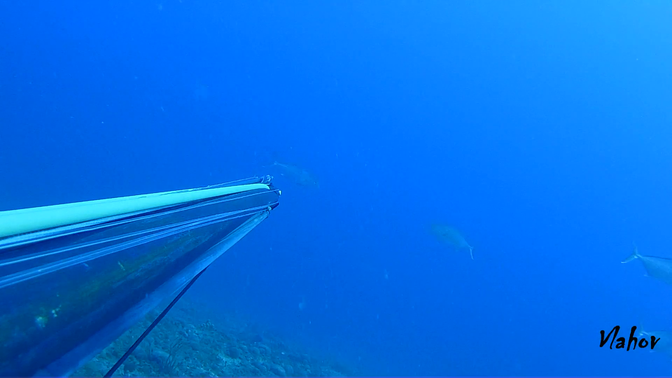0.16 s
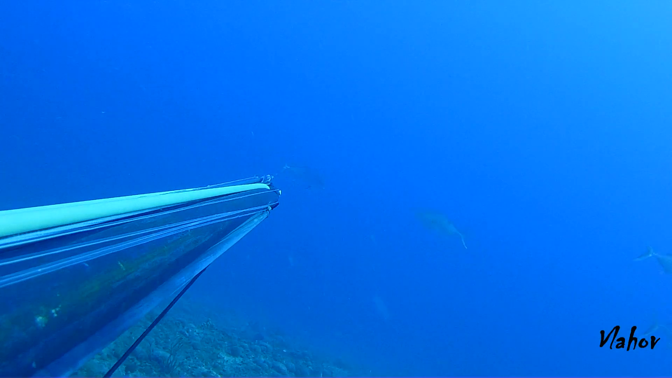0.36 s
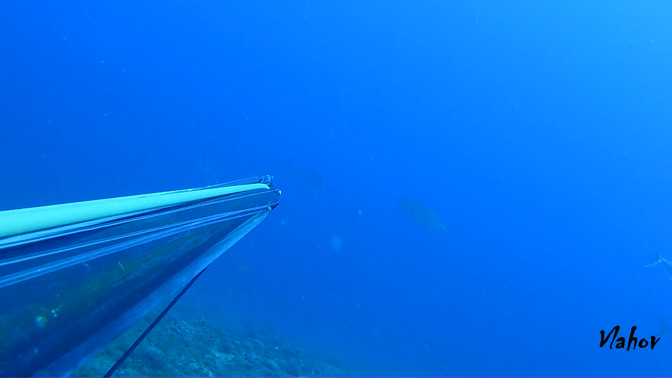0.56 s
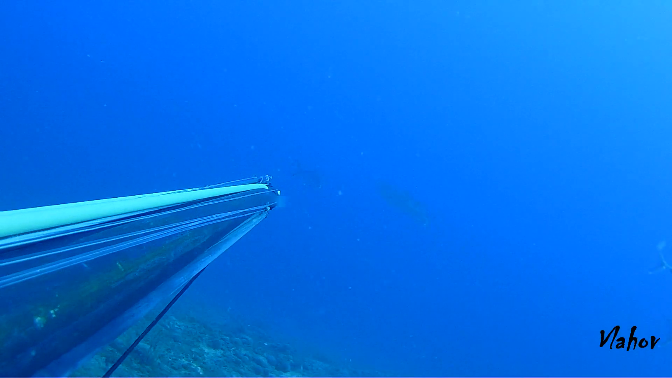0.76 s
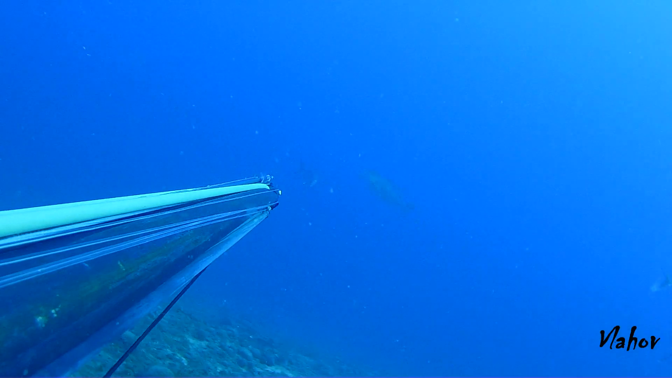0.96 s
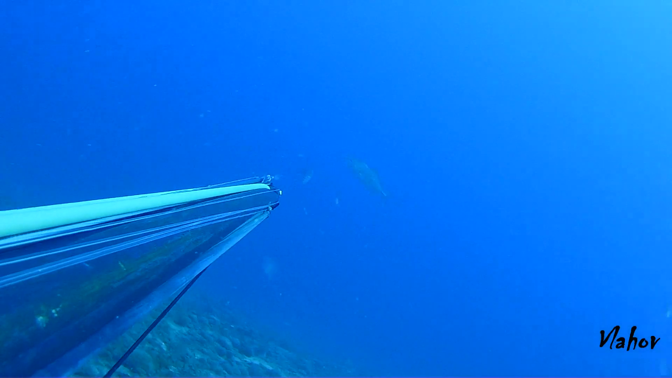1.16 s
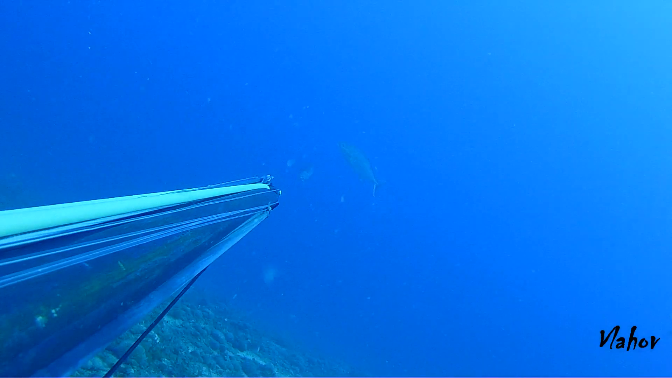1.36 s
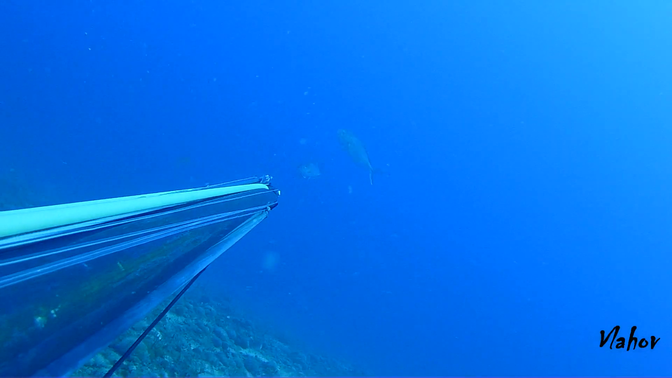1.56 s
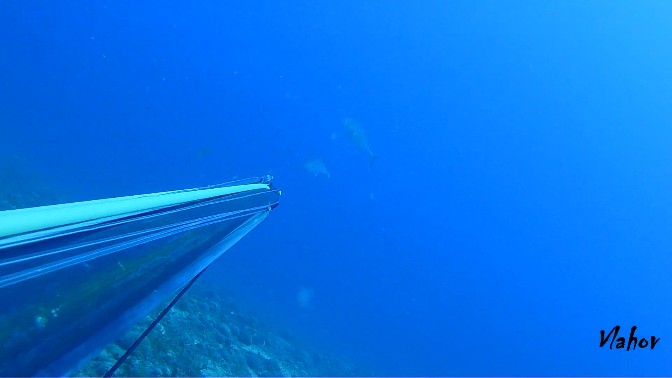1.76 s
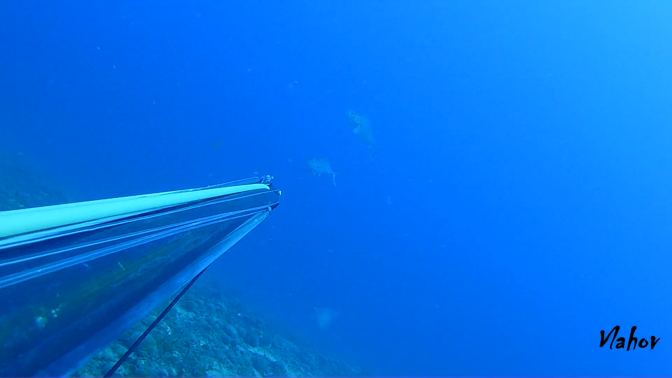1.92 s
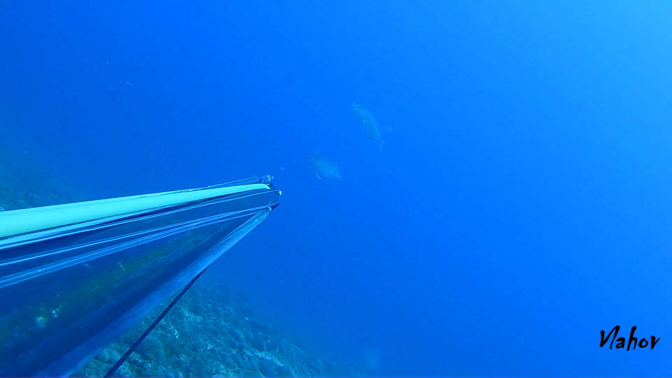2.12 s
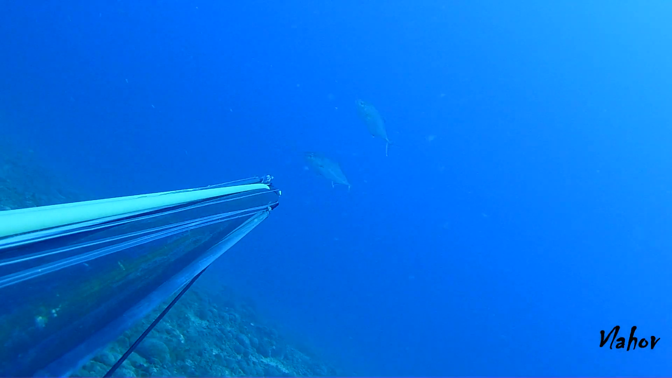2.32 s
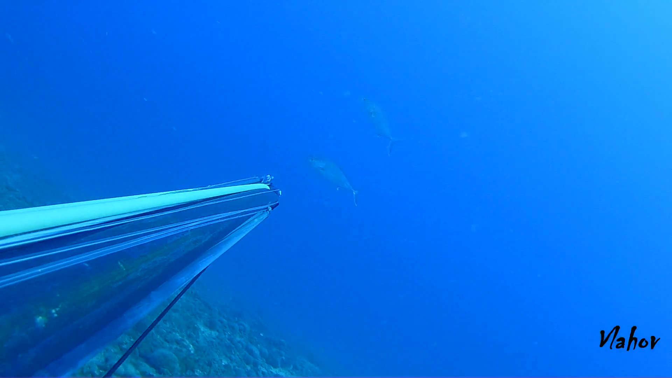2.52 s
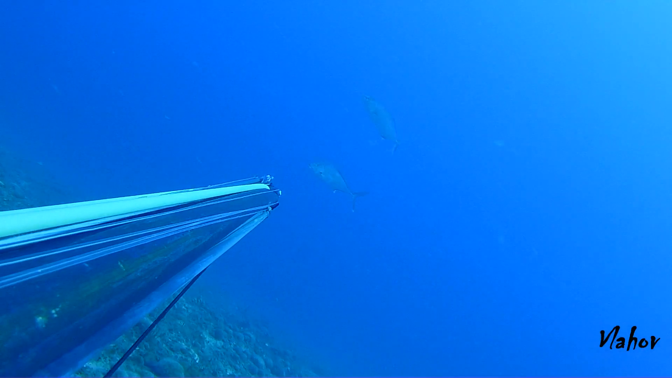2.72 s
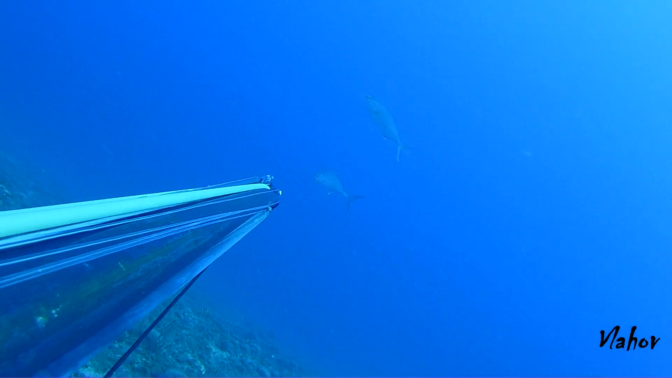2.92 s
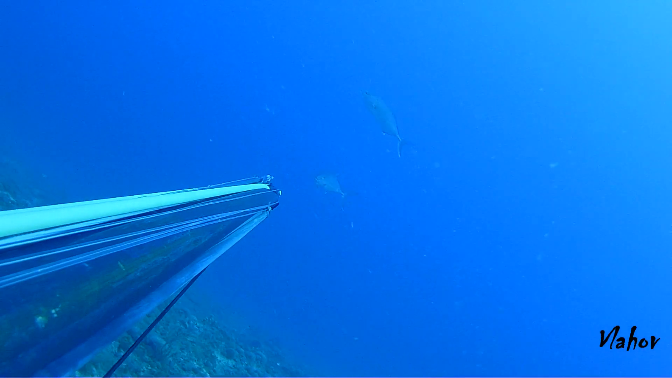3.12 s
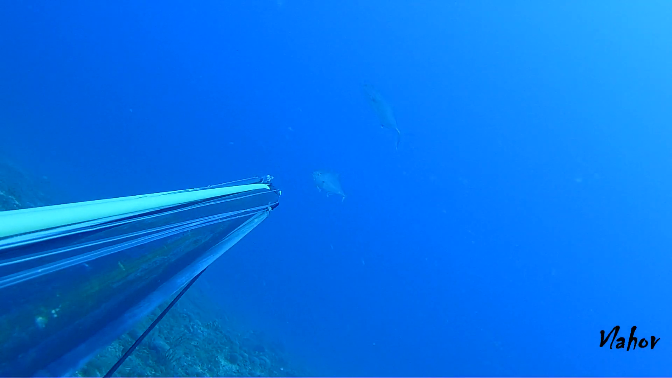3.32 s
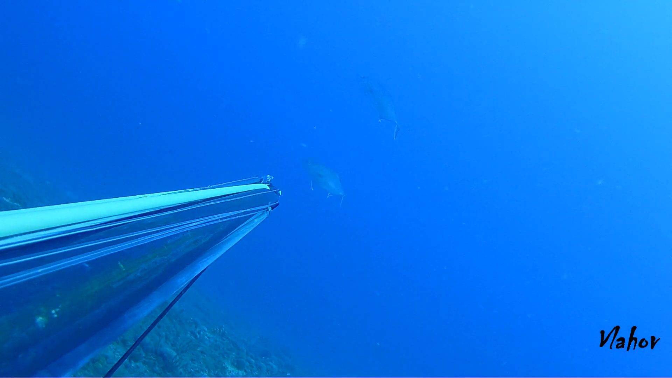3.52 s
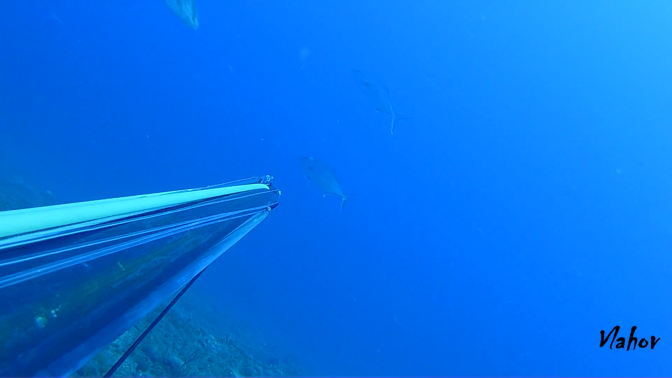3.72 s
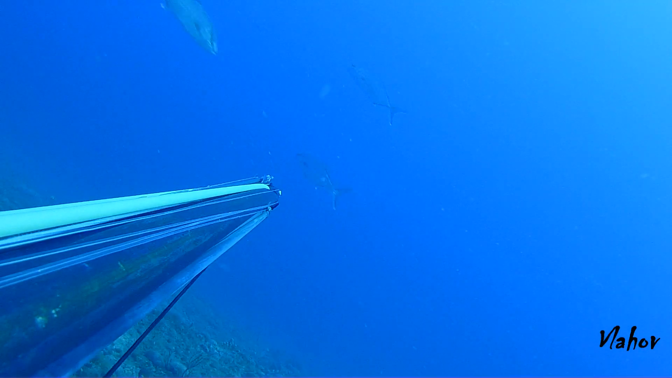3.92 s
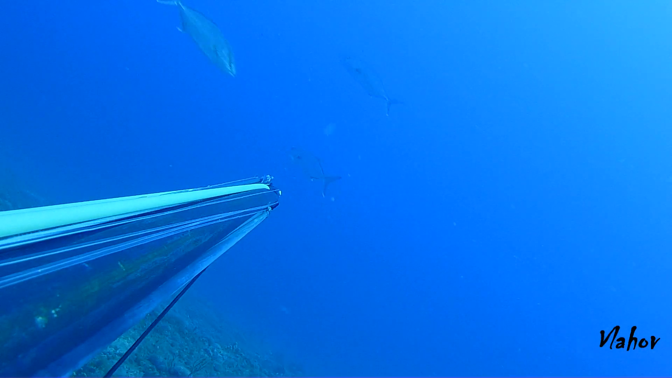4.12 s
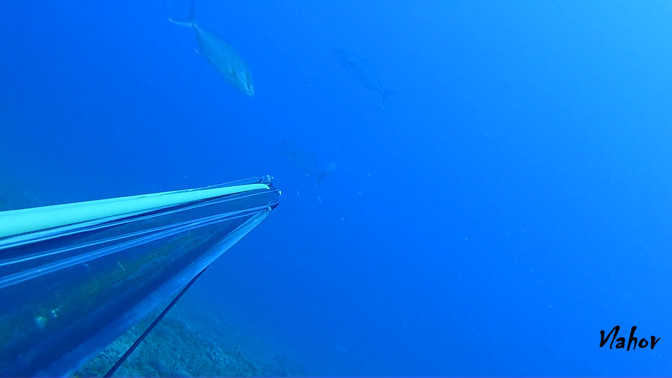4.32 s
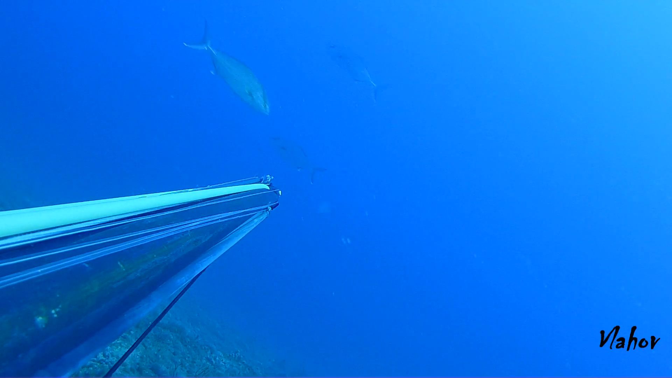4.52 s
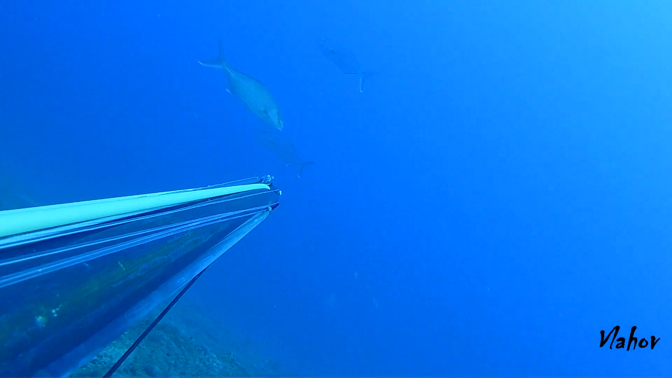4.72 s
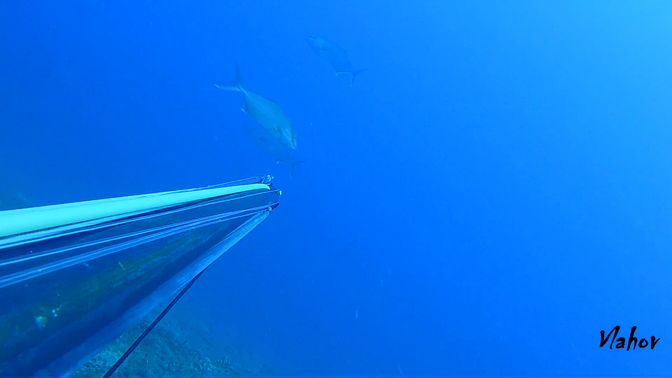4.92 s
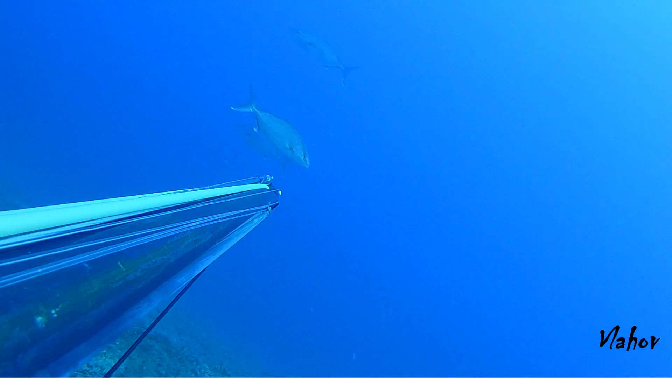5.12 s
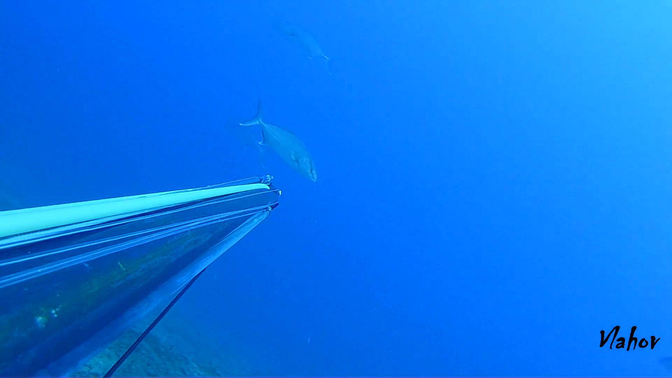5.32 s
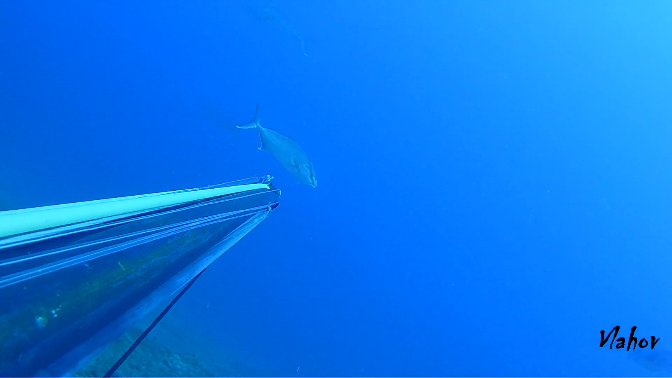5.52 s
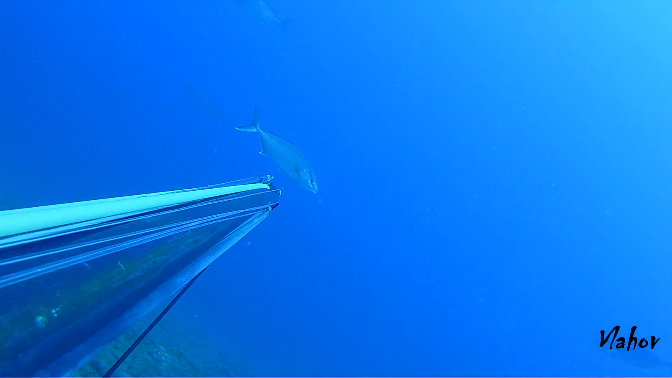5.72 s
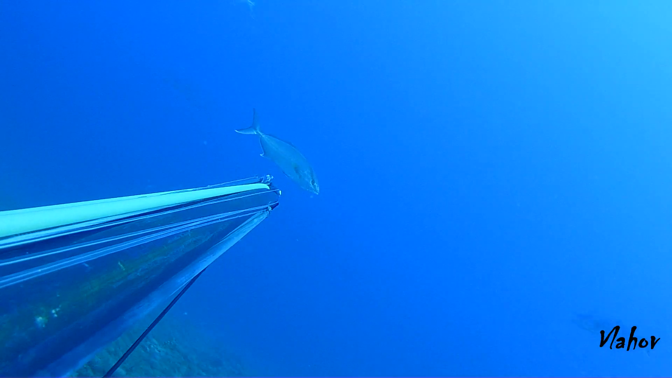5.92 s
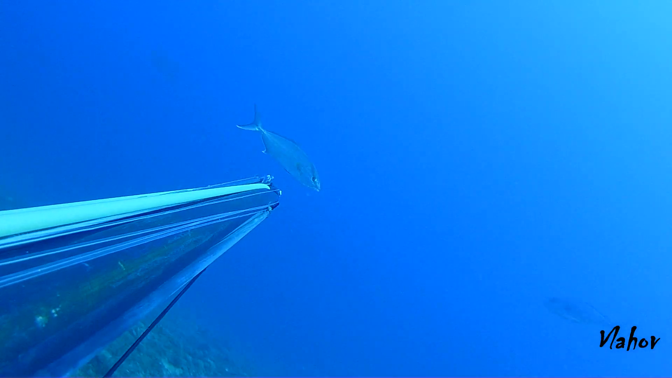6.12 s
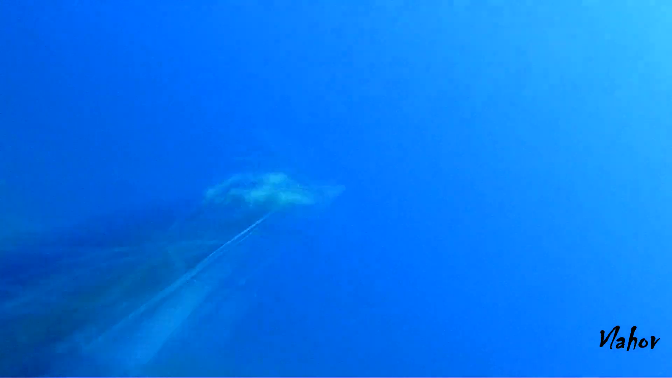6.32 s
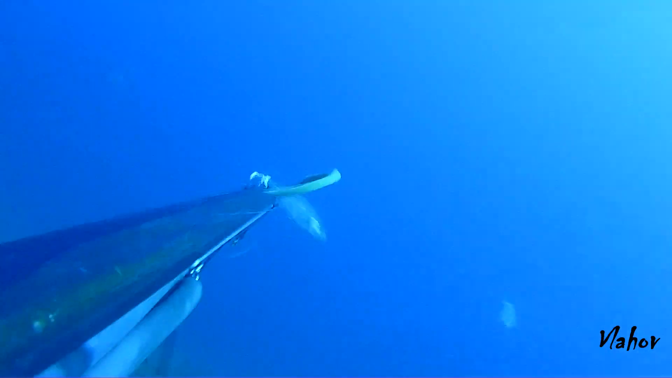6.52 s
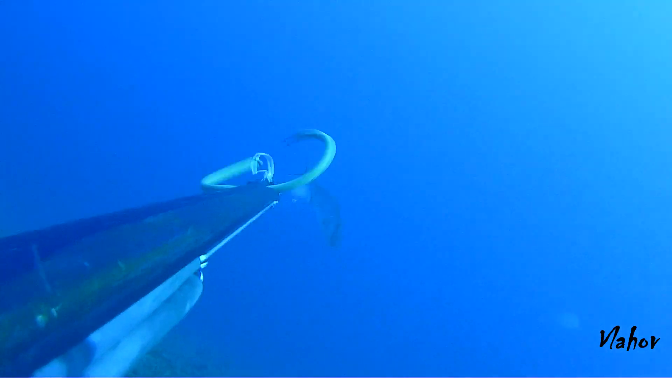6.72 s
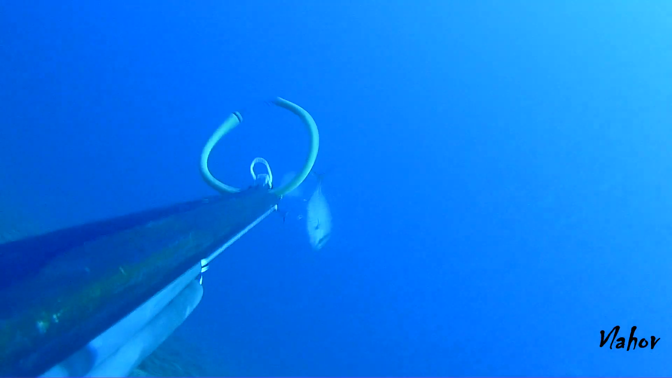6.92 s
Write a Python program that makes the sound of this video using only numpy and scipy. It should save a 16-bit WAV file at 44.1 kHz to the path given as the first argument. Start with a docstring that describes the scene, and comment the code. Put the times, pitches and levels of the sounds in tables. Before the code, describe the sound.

Underwater hush with shrimp crackle, dull knocks and short creaks of a handled speargun, then a violent clipped shot, slapping bands and line running out.

```python
"""Under the sea, a camera rides on a loaded speargun, in a soft wash of filtered noise and shrimp crackle.
First come small knocks and stuttering creaks of the handled gun: short forces ringing the modes of its body.
The gun fires: grains and noise scrape as the shaft runs down its track, the bands shove the water and slap
the barrel, then the line runs out. The loudest moments drive the microphone hard into flat clipping."""
import sys
import numpy as np
from scipy import signal
from scipy.fft import rfft, irfft, next_fast_len
from scipy.io import wavfile
from scipy.ndimage import map_coordinates

SR = 44100
rng = np.random.default_rng(int(sys.argv[2]) if len(sys.argv) > 2 else 0)


def to_wav(s):
    """Save 16-bit WAV."""
    ch = np.atleast_2d(s).T  # columns
    pcm = np.round(np.clip(ch, -1, 1) * 32767)  # PCM
    wavfile.write(sys.argv[1], SR, pcm.astype(np.int16))


N = 306495
TIME = np.arange(N) / SR  # [s]

# wash of open water, relative spectrum: (frequency [Hz], density [dB per Hz])
SEA_SPECTRUM = [(20, 3), (65, 1), (154, 0.5), (422, -4.5), (678, -7.5), (1200, -14), (1910, -19),
                (2500, -17), (3900, -25), (5300, -24.5), (6300, -27.5), (8800, -29), (11000, -31.5),
                (16000, -50)]
# one shrimp's claw snap, relative spectrum: (frequency [Hz], density [dB per Hz])
SNAP_SPECTRUM = [(500, -36), (1700, -18), (2500, 4), (3100, -0.5), (3800, -9.5), (4500, -3), (5400, -1),
                 (6300, -8.5), (7000, -2.5), (7700, -7), (9000, -4), (10500, -22), (15500, -8.5)]
# the nearest shrimp: (time [s], level before the near gain [dB], treble against the rest [dB])
NEAR_SNAPS = [(0.532, -33, -8), (2.196, -31, -11), (2.7433, -33, -4), (3.276, -38, 8), (3.439, -28, -17),
              (4.117, -36.5, -12), (4.4167, -30.5, -12.5), (4.95, -31.5, -7), (5.7606, -30, -16),
              (6.1073, -22, -2.5), (6.3072, -33.5, -2)]
# grip and gun rubbing softly, relative spectrum: (frequency [Hz], density [dB per Hz])
RUB_SPECTRUM = [(20, 7), (55, -2.5), (110, -0.5), (300, -15.5), (700, -21.5), (1800, -40), (3000, -63)]
# dull knocks on the handled gun: (time [s], peak level [dB])
KNOCK_HITS = [(.461, -7), (.553, -27.5), (.815, -14), (.895, -20.5), (.95, -24), (1.104, -10.5),
              (1.223, -25), (1.312, -29), (1.608, -8), (1.722, -20), (1.86, -12), (2.2, -24.5),
              (2.68, -9.5), (2.941, -5), (2.948, -17.5), (3.002, -24), (3.05, -23.5), (3.222, -10.5),
              (4.77, -23.5), (4.947, -12.5), (5.125, -8.5), (5.978, -14.5), (6.23, -10.5)]
# creaks, each a short run of slips: (time [s], peak level [dB], length [s])
CREAK_RUNS = [(.383, -18.5, 0.011), (1.244, -17.5, 0.0085), (1.742, -18.5, 0.017), (2.363, -20, 0.013),
              (2.868, -15, 0.0071), (3.097, -20.5, 0.006), (4.789, -20, 0.01), (5.009, -14.5, 0.01),
              (5.647, -20, .0081), (6.179, -16, 0.0088)]
# modes of the gun with its camera housing, before scatter: (frequency [Hz], relative level [dB], t60 [s])
BODY_MODES = [(39.7, -33, 0.32), (65.3, -30, 0.23), (104.6, -26.5, 0.78), (134.7, -17, 0.27),
              (157.9, -2, 0.08), (246.6, -12, 0.057), (300, -12.5, 0.046), (431, -20, 0.058),
              (546, -32.5, 0.091), (613.4, -24, 0.12), (1050, -12.5, 0.011), (1466, -14, 0.026),
              (1720, -12.5, 0.015), (2340, 4, 0.008)]
# what the housing wall lets through: (frequency [Hz], gain [dB])
WALL_GAIN = [(500, 0), (660, 4.5), (800, -10.5), (950, 0), (1200, -1.5), (1900, -1.5), (2100, -20.5),
             (2600, -21), (3400, -18.5), (5000, -49), (16000, -68)]
# the shaft leaves, then the line runs out: (time at full speed [s], hold [s], rise [dB/s],
# low thudding [dB], bright rattling [dB], surge of water [dB])
SHOT_RUNS = [(6.384, 0.21, 1100, 7.5, 9.5, 16.5), (6.871, 0.056, 432, -9.5, -6.5, -14.5)]
# hardest strikes of trigger, shaft and line, before the water cushions them: (time [s], level [dB], t60 [s])
CLASH_HITS = [(6.341, -20, .054), (6.348, -5.5, 0.046), (6.3637, 36, 0.018), (6.418, 36, 0.025),
              (6.432, 40.5, 0.0211), (6.4696, 37, 0.013), (6.498, 30.5, 0.03), (6.616, -6.5, 0.037),
              (6.627, 10, 0.0093), (6.669, -10.5, 0.05), (6.781, -15.5, 0.033), (6.809, -14, 0.021),
              (6.8727, 9, 0.017), (6.9, 8, .022)]
# shaft and line scraping, relative spectrum: (frequency [Hz], density [dB per Hz])
SCRAPE_SPECTRUM = [(60, -14), (160, 1.5), (320, -3.5), (480, -2), (660, 3.5), (850, -4), (1200, -12.5),
                   (1550, -2.5), (1850, -5), (2200, -29.5), (3200, -21), (4200, -37), (9000, -44.5),
                   (16000, -62)]
# water shoved past the housing, relative spectrum: (frequency [Hz], density [dB per Hz])
SURGE_SPECTRUM = [(15, -9.5), (40, 0.5), (60, -8), (80, -5), (140, -12), (220, -13.5), (500, -32.5),
                  (1500, -73.5)]

SEA_DB = -50.5
STRAY_COUNT, STRAY_DB, STRAY_TREBLE_DB = 28, -38, -7  # shrimp a little farther off, snapping at random
SLIDE_LAG_S, SLIDE_HALF_S, SLIDE_DB = 0.021, 0.027, -18.5  # grip slides; level against the creak
SWAY_LAG_S, SWAY_HALF_S, SWAY_DB = 0.033, 0.065, -45  # the gun sways a little after any knock
SOFT_CONTACT_HZ, HARD_CONTACT_HZ = 444, 2100  # brightness of the lightest touch; what a 0 dB blow adds
REBOUND_S, REBOUND_LOSS_DB, REBOUND_HZ = .054, 20, 747  # typical delay, loss and brightness of the fall back
TOUCH_COUNT, TOUCH_DB = 6, -37.5  # faint stray touches
LEAD_S = .0012  # handling blows start this early, since the load takes a moment to build up
FLAP_START_S, FLAP_GAP_S, FLAP_COUNT = 6.532, .0312, 8
FLAP_DB, FLAP_LOSS_DB = 5, 2.5  # the first flap, and the loss from each to the next
FLAP_FIRST_HZ, FLAP_LAST_HZ = 200, 850  # contact brightness, from a broad slap to a light tap
THUD_SAG_DB_PER_S, RATTLE_SAG_DB_PER_S, SURGE_SAG_DB_PER_S = 61.5, 99.5, 119.5  # water brakes each run
THUD_RELEASE_DB_PER_S, RATTLE_RELEASE_DB_PER_S, SURGE_RELEASE_DB_PER_S = 1000, 339, 400  # after a run
SLACK_THUD_DB, SLACK_RATTLE_DB, SLACK_SURGE_DB = -30.5, -37, -24  # water churning around the slack line
CLATTER_PER_S, CLATTER_DB, CLATTER_T60_S = 50, 8, .02  # lighter strikes; level against the rattling
TOP_HZ = 16100  # band limit of the camera


def amp(db):
    """Decibels to gain."""
    return 10 ** (np.asarray(db) / 20)


def unit(x):
    """Scale to rms 1."""
    return x / np.sqrt(np.mean(x ** 2) + 1e-20)


def fade(t, t60):
    """Exponential decay, 60 dB down after t60."""
    return np.exp(-np.log(1000) * t / t60)


def add(track, s, sound):
    """Mix a sound into the track from time s."""
    room = track[max(round(s * SR), 0):][:len(sound)]
    room += sound[:len(room)]


def lowpass(x, hz, order):
    """Causal low-pass."""
    return signal.sosfilt(signal.butter(order, np.clip(hz, 20, SR / 2 - 1), fs=SR, output="sos"), x)


def highpass(x, hz, order):
    """Causal high-pass."""
    return signal.sosfilt(signal.butter(order, np.clip(hz, 20, SR / 2 - 1), "high", fs=SR, output="sos"), x)


def colour(x, points):
    """Causal minimum-phase filter whose gain follows (frequency [Hz], gain [dB]) points on a log axis."""
    size = 2 * next_fast_len(len(x))
    hz, db = np.transpose(points)
    gain = amp(np.interp(np.log(np.fft.rfftfreq(size, 1 / SR) + 1), np.log(hz), db))
    # folding the cepstrum onto positive time makes the filter causal
    cepstrum = irfft(np.log(gain))
    cepstrum[1:size // 2] *= 2
    cepstrum[size // 2 + 1:] = 0
    return irfft(rfft(x, size) * np.exp(rfft(cepstrum)))[:len(x)]


def noise(points):
    """Coloured noise of rms 1."""
    return unit(colour(rng.standard_normal(N), points))


def wobble(rate):
    """A smooth random curve, rate knots a second."""
    return map_coordinates(rng.standard_normal(4096), [TIME * rate], mode="wrap")


def grains(rate, spread_db):
    """Random impulses, rate a second on average, most small and a few large."""
    hit = rng.random(N) < rate / SR
    size_db = spread_db * np.minimum(rng.exponential(size=N), 4)
    return hit * rng.choice([-1, 1], N) * amp(size_db)


def sea():
    """The soft, slowly shifting wash of open water."""
    return amp(SEA_DB + 0.68 * wobble(rate=4.14)) * noise(SEA_SPECTRUM)


def shrimp(near_db=11, far_db=-62.5, ring_t60=0.015, ring_share=0.15):
    """Claw snaps, a few near and a dense crackle far off, each ringing briefly in the housing."""
    t = TIME[:SR // 25]
    hz, snap_db = np.transpose(SNAP_SPECTRUM)
    octaves = np.log2(np.clip(hz, 2500, 9000) / 5000)

    def snap(treble_db):
        """One click of unit energy with a noisy tail."""
        # snaps that come off the rocks are both duller and more drawn out
        bright = treble_db + 8
        click = ring_share * rng.standard_normal(len(t)) * fade(t, ring_t60 / amp(bright))
        click[0] += 1
        click = colour(click, np.c_[hz, snap_db + .8 * bright * octaves])
        click = lowpass(click, 14000, order=4)
        return click / np.linalg.norm(click)

    near = np.zeros(N)
    for s, db, treble_db in NEAR_SNAPS:
        add(near, s, amp(db + near_db) * snap(treble_db))
    for when, size, tone in rng.random((STRAY_COUNT, 3)):
        level_db = STRAY_DB + near_db + 6.7 * (size - .5)
        add(near, when * TIME[-1], amp(level_db) * snap(STRAY_TREBLE_DB + 16 * (tone - .5)))
    far = np.zeros(N)
    for treble_db in np.linspace(-13, -3, num=8):
        far += signal.fftconvolve(grains(rate=22, spread_db=3.0), snap(treble_db))[:N]
    return near + amp(far_db) * unit(far)


def rubs():
    """Soft rumbling swells: the grip slides as each creak lets go, and the gun sways after each knock."""
    def swell(s, half):
        """A bell-shaped rise and fall around time s."""
        return np.exp(-((TIME - s) / half) ** 2)

    slides = sum(amp(db + SLIDE_DB) * swell(s + SLIDE_LAG_S, SLIDE_HALF_S) for s, db, _ in CREAK_RUNS)
    sways = amp(SWAY_DB) * sum(swell(s + SWAY_LAG_S, SWAY_HALF_S) for s, _ in KNOCK_HITS)
    return (slides + sways) * noise(RUB_SPECTRUM) * amp(4.0 * wobble(rate=60))


def gun_ring(force, contact_hz, scatter_db=4.0, loose=0.94, loose_hz=500, loose_t60=0.061, tick_db=-31):
    """The body's answer to a force, peak 1 plus a tick; each blow shares its energy differently among modes."""
    t = np.arange(SR // 2) / SR
    hz, db, t60 = np.transpose(BODY_MODES)[:, :, None]
    size, detune = rng.standard_normal((2, len(BODY_MODES), 1))
    modes = np.cos(2 * np.pi * hz * (1 + 0.019 * detune) * t) * fade(t, t60)
    ring = np.sum(amp(db + scatter_db * size) * modes, axis=0)
    # the load builds up and lets go: the slower the build-up, the duller the blow
    load = np.exp(-2 * np.pi * contact_hz * t[:SR // 500])[::-1]
    # loose fittings chatter on after the blow and roughen its upper modes
    chatter = rng.standard_normal(len(t)) * (fade(t, loose_t60) - fade(t, 0.0072))
    chatter = highpass(chatter, loose_hz, order=2)
    chatter *= loose / np.linalg.norm(chatter)
    chatter[0] = 1
    ring = signal.fftconvolve(ring, chatter)
    ring = signal.fftconvolve(ring, np.convolve(force, load))[:len(t)]
    ring = colour(ring, WALL_GAIN)
    # only a faint tick gets through above the body's last resonances
    tick = highpass(rng.standard_normal(len(t)), 1700, order=1)
    tick = lowpass(tick, 3000, order=2) * fade(t, 0.04)
    return ring / np.abs(ring).max() + amp(tick_db) * np.roll(tick, SR // 500)


def push(db, contact_hz, loose=0.8):
    """A single push that leaves the barrel ringing low; the sharper it is, the more it shakes the fittings."""
    return amp(db) * gun_ring([1.], contact_hz, loose=loose * contact_hz / 700)


def knocks():
    """Harder knocks are brighter, each is followed by a light rebound, and faint touches fall in between."""
    out = np.zeros(N)
    for s, db in KNOCK_HITS:
        add(out, s - LEAD_S, push(db, SOFT_CONTACT_HZ + HARD_CONTACT_HZ * amp(db) ** 2))
        # the part falls back once
        rebound = s + REBOUND_S * np.exp(.12 * rng.standard_normal())
        add(out, rebound, push(db - REBOUND_LOSS_DB, REBOUND_HZ))
    for s in rng.uniform(KNOCK_HITS[0][0], SHOT_RUNS[0][0], TOUCH_COUNT):
        add(out, s, push(TOUCH_DB, SOFT_CONTACT_HZ))
    return out


def creaks(slip_hz=540, jitter=0.432, first_share=0.55):
    """A tight part sticks and slips at an uneven pace, on the whole harder each time, until it comes free."""
    out = np.zeros(N)
    for s, db, length in CREAK_RUNS:
        gap, size = rng.standard_normal((2, 24))
        when = np.cumsum(np.exp(jitter * gap)) / slip_hz
        when -= when[0]
        progress = when / length
        # the sixth power all but silences slips past the creak's length
        slips = (first_share + progress) * np.exp(0.19 * size - progress ** 6)
        force = np.bincount((when * SR).astype(int), slips)
        add(out, s - LEAD_S, amp(db) * gun_ring(force, contact_hz=1390, loose=0.38))
    return out


def flaps():
    """The spent bands whip against the barrel at an even pace, lighter and crisper each time."""
    out = np.zeros(N)
    for k, contact_hz in enumerate(np.geomspace(FLAP_FIRST_HZ, FLAP_LAST_HZ, num=FLAP_COUNT)):
        add(out, FLAP_START_S + k * FLAP_GAP_S, push(FLAP_DB - k * FLAP_LOSS_DB, contact_hz))
    return out


def bubbles(centre_hz, spread, cycles, rise, count):
    """Overlapping short notes of torn water, each gliding upward; rms 1 from the first hard clash on."""
    out, t = np.zeros(N), TIME[:SR // 16]
    first = CLASH_HITS[0][0]
    starts = first + (TIME[-1] - first) * (np.arange(count) + rng.random(count)) / count
    for s, (pitch, size) in zip(starts, rng.standard_normal((count, 2))):
        hz = centre_hz * np.exp(spread * pitch)
        age = t * hz / cycles
        glide = 1 + rise * np.minimum(age, 3) / 2
        add(out, s, amp(3.6 * size) * age * np.exp(-3 * age) * np.sin(2 * np.pi * hz * t * glide))
    return out / out[round(first * SR):].std()


def run_level(peaks_db, sag_db_per_s, release_db_per_s, slack_db):
    """Gain of one shot layer: each run rises, sags as water brakes it, and falls back to the churning."""
    gain = amp(slack_db) * (TIME > SHOT_RUNS[0][0])
    for (s, hold, rise_db_per_s, *_), db in zip(SHOT_RUNS, peaks_db):
        age = TIME - s
        drop_db = rise_db_per_s * np.maximum(-age, 0)
        drop_db += sag_db_per_s * np.clip(age, 0, hold)
        drop_db += release_db_per_s * np.maximum(age - hold, 0)
        gain = np.maximum(gain, amp(db - drop_db))
    return gain


def shot(thud_bubbles=0.69, rattle_bubbles=0.46):
    """Shaft and line scrape and strike the gun while the bands tear and shove the water past the housing."""
    *_, thud_db, rattle_db, surge_db = np.transpose(SHOT_RUNS)
    thudding = run_level(thud_db, THUD_SAG_DB_PER_S, THUD_RELEASE_DB_PER_S, SLACK_THUD_DB)
    rattling = run_level(rattle_db, RATTLE_SAG_DB_PER_S, RATTLE_RELEASE_DB_PER_S, SLACK_RATTLE_DB)
    surging = run_level(surge_db, SURGE_SAG_DB_PER_S, SURGE_RELEASE_DB_PER_S, SLACK_SURGE_DB)
    scrape = colour(grains(rate=2000, spread_db=4.5), SCRAPE_SPECTRUM)
    # the contact keeps shifting, so low thuds and bright rattles come and go separately
    thuds = unit(lowpass(scrape, 710, order=2) * amp(6.6 * wobble(rate=120)))
    rattles = -unit(highpass(scrape, 970, order=2) * amp(5.2 * wobble(rate=150)))
    low_bubbles = bubbles(centre_hz=659.0, spread=0.427, cycles=5.84, rise=.15, count=60)
    high_bubbles = bubbles(centre_hz=1404.0, spread=0.18, cycles=7.7, rise=0.067, count=90)
    thuds = 0.91 * thuds + thud_bubbles * low_bubbles
    rattles = 0.77 * rattles + rattle_bubbles * high_bubbles
    # strikes are decaying envelopes that gate scraping noise
    strike_time = TIME[:SR // 4]
    clatter = amp(CLATTER_DB) * rattling * np.abs(grains(rate=CLATTER_PER_S, spread_db=1.5))
    blows = signal.fftconvolve(clatter, fade(strike_time, CLATTER_T60_S))[:N]
    for start, db, t60 in CLASH_HITS:
        add(blows, start, amp(db) * fade(strike_time, t60))
    # water cushions the start of every blow
    blows = lowpass(blows, 310, order=1)
    scraping = thudding * thuds + rattling * rattles
    return scraping + blows * noise(SCRAPE_SPECTRUM) + surging * noise(SURGE_SPECTRUM)


def scene():
    """Everything reaches the one microphone through the housing."""
    background = sea() + shrimp()
    handling = rubs() + knocks() + creaks()
    return (background + handling + flaps() + shot())[None]


def record(dry, ceiling=0.46):
    """The input clips flat, and the camera keeps nothing above its band limit."""
    clipped = np.clip(dry, -ceiling, ceiling)
    size = next_fast_len(N + SR // 2)
    kept = np.fft.rfftfreq(size, 1 / SR) < TOP_HZ
    return irfft(rfft(clipped, size) * kept, size)[..., :N]


dry = scene()
out = record(dry)
to_wav(out)
```